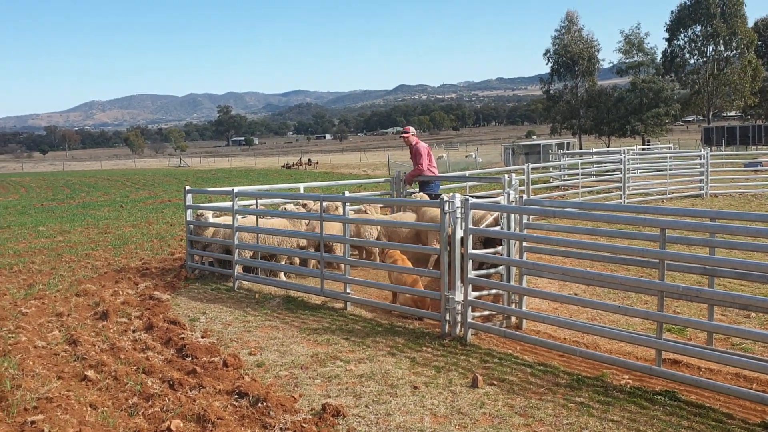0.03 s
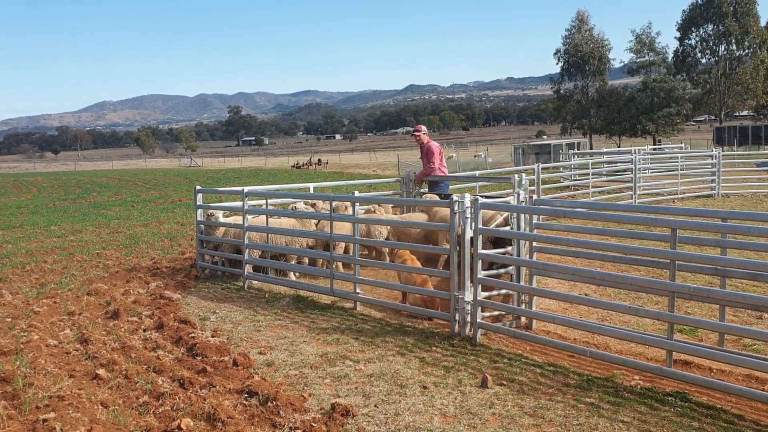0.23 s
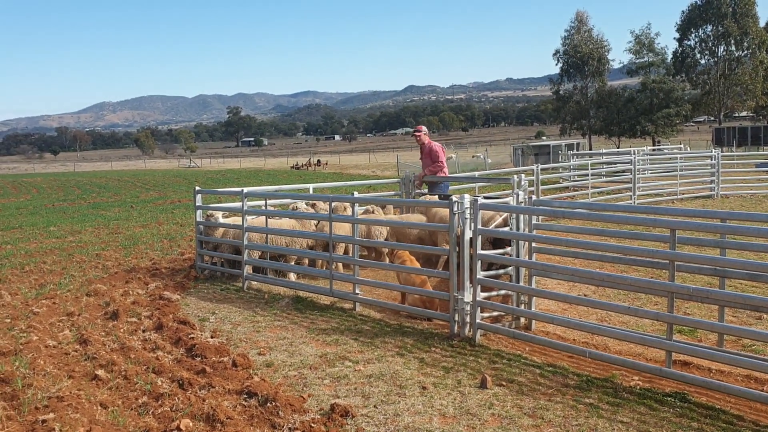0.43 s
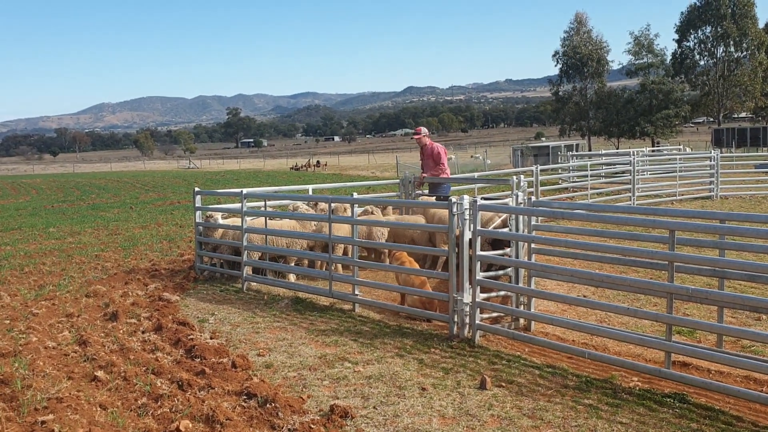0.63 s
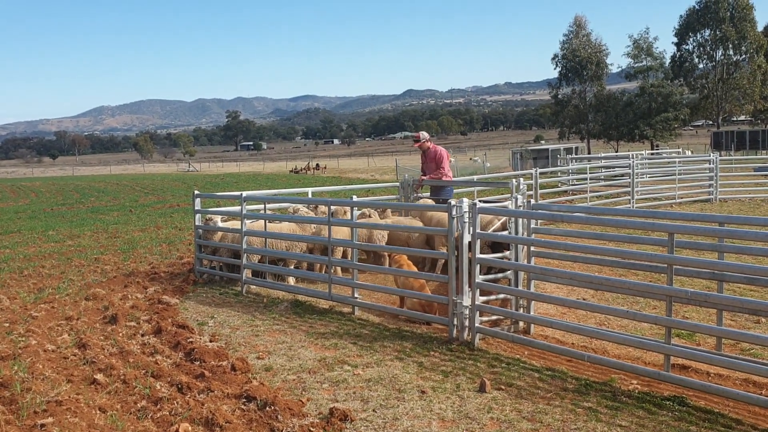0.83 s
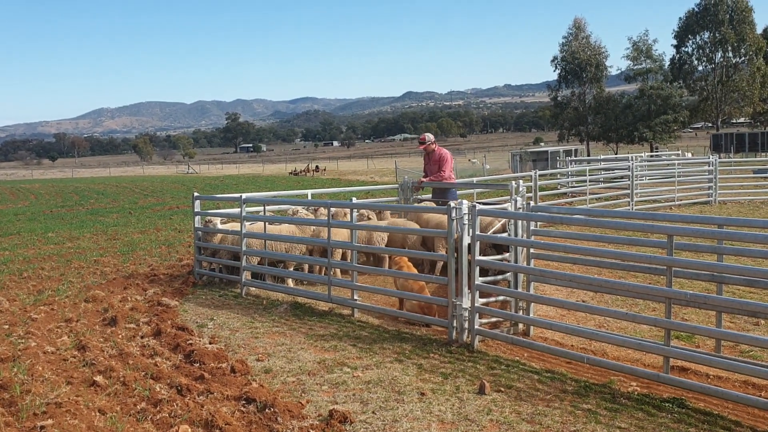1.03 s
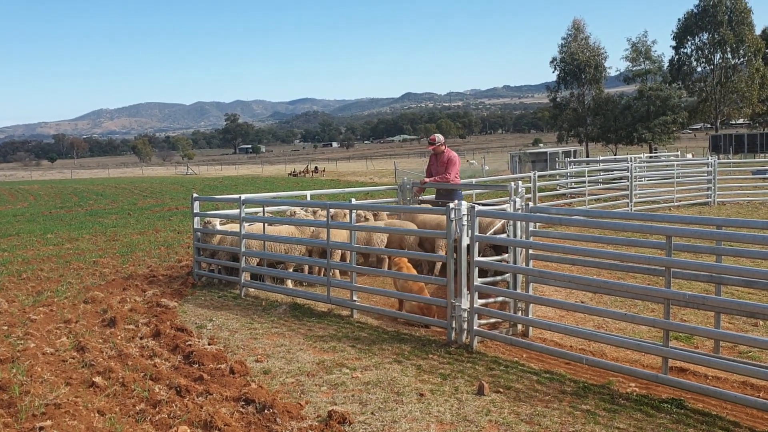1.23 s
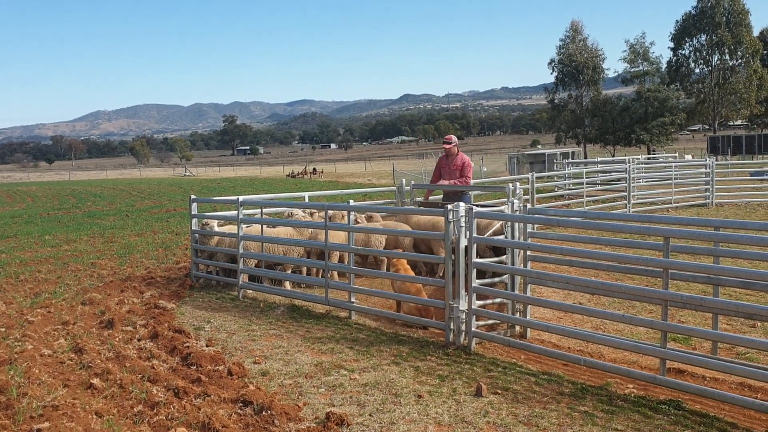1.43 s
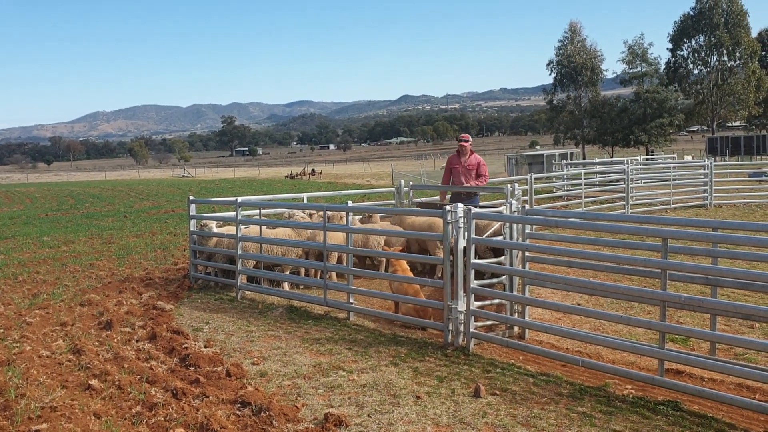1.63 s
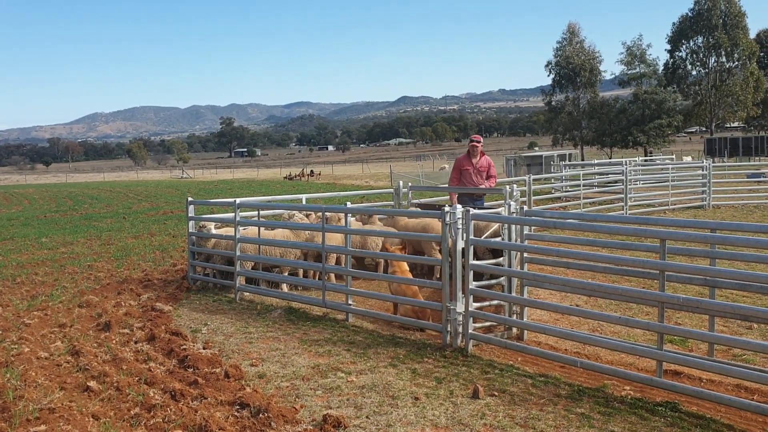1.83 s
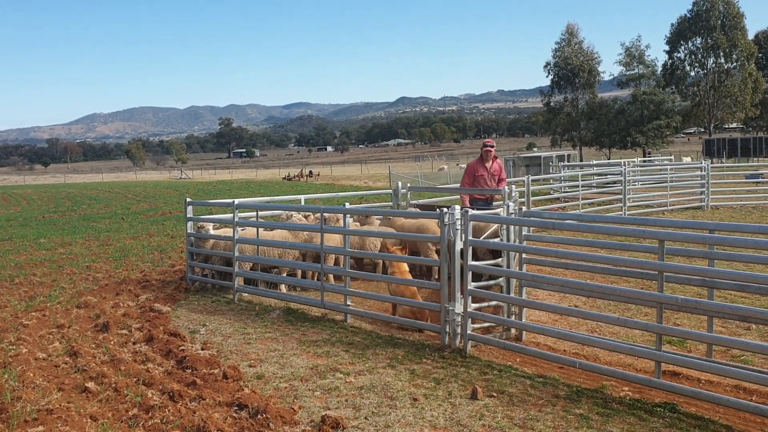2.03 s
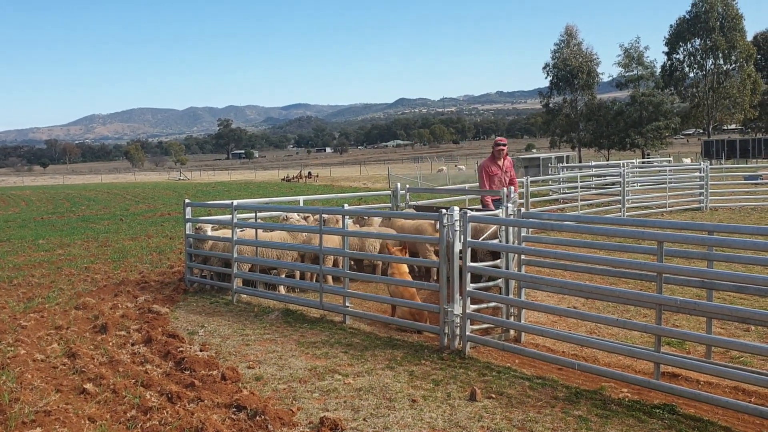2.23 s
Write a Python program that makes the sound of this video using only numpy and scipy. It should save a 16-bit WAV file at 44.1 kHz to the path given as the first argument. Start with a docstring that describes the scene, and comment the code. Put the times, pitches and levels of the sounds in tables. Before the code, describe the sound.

Steel pen rails clang at about 0.1 seconds and ring until roughly 0.8. Faint gate knocks build into a loud rattle against the post from 1.3 to 1.7 seconds, with sharp clacks and a faint low drone. More knocks come near 1.9 seconds, then fade. A small chain jingles high throughout. Light wind buffets the microphone in the open air, and everything is louder on the left.

```python
"""A steel stockyard panel is struck and rings, then a gate knocks and rattles against its post.
Each blow excites clear tube modes, dense overtones and a hollow clonk; the gate's frame drones low.
A chain jingles on the rails throughout, its small links ringing very high.
Light wind buffets the microphone over distant air. Outdoors, no room, louder on the left."""
import sys
import numpy as np
from scipy import signal
from scipy.fft import rfft, irfft, next_fast_len
from scipy.io import wavfile
from scipy.ndimage import uniform_filter1d

SR = 44100
rng = np.random.default_rng(int(sys.argv[2]) if len(sys.argv) > 2 else 0)


def wrap_up_sound(samples):
    """Save the sound to the file named by the first command line argument, as 16-bit audio."""
    columns = np.atleast_2d(samples).T
    # keep every value between -1 and 1, then stretch to whole-number steps
    tamed = np.clip(columns, -1, 1)
    steps = np.round(tamed * 32767).astype(np.int16)
    wavfile.write(sys.argv[1], SR, steps)


N = 101429
RING_N, EDGE_HZ, CONTACT_S = 57600, 14600, 0.00025
RING_TIME_S, BIN_HZ = np.arange(RING_N) / SR, np.fft.rfftfreq(RING_N, 1 / SR)
TIME_S = np.arange(N) / SR


def amp(db):
    """Decibels to gain."""
    return 10 ** (np.asarray(db) / 20)


def curve_at(points, hz):
    """Interpolates a table on a log-frequency axis."""
    point_hz, value = np.transpose(points)
    return np.interp(np.log(hz + 1), np.log(point_hz), value)


def add(mix, start_s, sound):
    """Mixes in a stereo sound."""
    part = mix[:, max(round(start_s * SR), 0):][:, :sound.shape[1]]
    part += sound[:, :part.shape[1]]


def equalise(x, colour, fft_size):
    """Filters by a table of Hz and dB."""
    gain = amp(curve_at(colour, np.fft.rfftfreq(fft_size, 1 / SR)))
    return irfft(rfft(x, fft_size) * gain, fft_size)


def noise(colour, length=N):
    """Steady coloured noise, rms 1."""
    size = next_fast_len(length)
    x = equalise(rng.standard_normal(size), colour, size)[:length]
    return x / np.sqrt(np.mean(x ** 2) + 1e-20)


def fade(t60_s, rise_s):
    """Linear rise, exponential decay."""
    return np.minimum(RING_TIME_S / rise_s, 1) * np.exp(-np.log(1000) * RING_TIME_S / t60_s)


# Each row: frequency in Hz, scale of the random phase between the ears in radians.
EAR_PHASE = [(500, -4), (1100, 0.04), (2000, 1.15), (4500, 1.5), (13000, 3.5)]


def strike(hz, spread_db=2.5):
    """Random strength and phase of each mode for one blow, at both ears."""
    strength, turns, apart = rng.standard_normal((3, len(hz)))
    left = amp(spread_db * strength) * np.exp(2j * np.pi * turns)
    return np.array([left, left * np.exp(1j * apart * curve_at(EAR_PHASE, hz))])


def tones(modes, size=RING_N, rise_s=0.00078, vary_levels=True):
    """Clear decaying modes, rms 1 before the envelope."""
    hz, db, t60_s = np.transpose(modes)
    t = RING_TIME_S[:size]
    blow = strike(hz)
    weight = amp(db) * (blow if vary_levels else blow / abs(blow))
    waves = np.exp(np.outer(2j * np.pi * hz - np.log(1000) / t60_s, t))
    return (weight @ waves).real * np.minimum(t / rise_s, 1) * np.sqrt(2) / np.linalg.norm(weight[0])


def overtone_bins(mean_gap_hz=13):
    """Picks the irregularly spaced modes of one steel body."""
    return np.flatnonzero((rng.random(len(BIN_HZ)) < BIN_HZ[1] / mean_gap_hz) & (BIN_HZ < EDGE_HZ))


def clash(bins, colour, decay, rise_s=CONTACT_S):
    """Dense modes struck at once, each band dying at its own rate; rms 1 before the envelope."""
    lines = np.zeros((2, len(BIN_HZ)), complex)
    lines[:, bins] = strike(BIN_HZ[bins]) * amp(curve_at(colour, BIN_HZ[bins]))
    lines *= RING_N / np.sqrt(2) / np.linalg.norm(lines[0])
    centres_hz, t60s = np.transpose(decay)
    bands = (irfft(lines * np.interp(BIN_HZ, centres_hz, band)) for band in np.eye(len(decay)))
    return sum(band * fade(t60_s, rise_s) for band, t60_s in zip(bands, t60s))


# Each row: frequency in Hz, relative density in dB.
AIR_SPECTRUM = [(100, 8), (500, -13.5), (1000, -8), (2000, -10), (5000, -20.5), (9000, -42.5),
                (14000, -12.5)]


def air(level_db=-66):
    """Distant air, independent on each side."""
    return amp(level_db) * np.array([noise(AIR_SPECTRUM), noise(AIR_SPECTRUM)])


def eddies(colour, length=N):
    """Turbulence of even strength."""
    x = noise(colour, length)
    power = uniform_filter1d(uniform_filter1d(x ** 2, size=600), size=600)
    return x / np.sqrt(power + 0.0014)


# Each row: time in seconds, left level in dB, right level in dB.
BREEZE_LEVELS = [(0, -44, -57.5), (.7, -43.5, -44), (1.2, -49.5, -62.5), (1.6, -47.5, -53.5),
                 (2.3, -43.5, -56)]
# Each row: frequency in Hz, relative density in dB.
BREEZE_SPECTRUM = [(20, -34), (36, -12), (58, 6), (90, 7.5), (150, -18), (300, -25), (550, -40),
                   (1200, -58.5)]
# Each row: centre in seconds, level in dB, Gaussian half width in seconds.
WIND_PUFFS = [(.278, -26, 0.012), (0.309, -21.5, 0.0044), (0.339, -19.5, .008), (0.352, -15.5, 0.0055),
              (0.384, -33, 0.015), (0.461, -26.5, .009), (0.484, -25.5, 0.011), (0.563, -28.5, 0.0061),
              (.648, -31.5, 0.013), (0.69, -28, 0.0081), (0.731, -34, 0.021), (0.905, -28, 0.0094),
              (0.994, -37.5, 0.0048), (1.031, -31, 0.0075), (1.063, -28.5, 0.0073), (1.088, -30, 0.009),
              (1.163, -37, 0.014), (1.226, -35, .013), (1.279, -38, 0.0074), (1.326, -36.5, 0.013),
              (1.53, -33.5, 0.0071), (1.567, -37, 0.016), (1.646, -35, 0.021), (1.747, -30, 0.012),
              (1.811, -31.5, 0.0066), (1.842, -32.5, 0.012), (1.908, -29, 0.015), (2.041, -40.5, 0.043),
              (2.211, -34.5, 0.0059)]
# Each row: multiple of PUFF_HZ, relative density in dB.
PUFF_SPECTRUM = [(.3, -14.5), (1, 7), (4, -29.5), (14, -75.5)]
PUFF_HZ, PUFF_N = 72, 12000


def wind():
    """A breeze rumbles on each microphone port separately; puffs thump on the left one."""
    times_s, left_db, right_db = np.transpose(BREEZE_LEVELS)
    out = np.array([amp(np.interp(TIME_S, times_s, db)) * eddies(BREEZE_SPECTRUM)
                    for db in (left_db, right_db)])
    offset_s = np.arange(-PUFF_N // 2, PUFF_N // 2) / SR
    colour = [(ratio * PUFF_HZ, db) for ratio, db in PUFF_SPECTRUM]
    for centre_s, db, width_s in WIND_PUFFS:
        puff = amp(db) * np.exp(-(offset_s / width_s) ** 2 / 2) * eddies(colour, PUFF_N)
        add(out, centre_s + offset_s[0], np.outer([1, 0], puff))
    return out


# Each row: start in seconds, level in dB, T60 in seconds, tilt in dB per kHz.
CHAIN_CLINKS = [(.004, -46.5, 0.051, 1), (0.097, -32, 0.29, 2), (0.118, -25.5, 0.29, -6),
                (.152, -32, 0.27, 8), (0.188, -30, 0.18, -1), (0.211, -28, 0.21, 0), (.258, -34, 0.26, -12),
                (0.301, -39.5, 0.15, -14), (0.338, -39.5, 0.088, -5), (0.416, -54, 0.27, -13),
                (0.434, -45.5, 0.18, -5), (0.479, -47, 0.79, -12), (.529, -37.5, 0.13, -8),
                (.544, -44.5, 0.23, 9), (.586, -41.5, 0.13, 3), (0.622, -49, 0.14, 1),
                (.651, -37.5, 0.23, -10), (.662, -33, 0.17, -4.5), (0.803, -49.5, 0.34, -2),
                (0.848, -49.5, 0.16, -1), (.946, -49, 0.23, -1), (1.144, -45.5, 0.057, -6),
                (1.232, -48.5, 0.3, -9), (1.288, -34.5, 0.12, -3), (1.382, -39, 0.19, -6),
                (1.483, -41, 0.61, -15), (1.518, -34.5, 0.28, 15), (1.584, -30.5, 0.16, -18),
                (1.591, -35.5, 0.3, -6), (1.877, -34, 0.28, -5), (1.995, -51.5, 0.14, -2)]
# Each row: frequency in Hz, relative level in dB, multiple of the clink's T60.
LINK_TONES = [(12482, 0, 1.15), (12515, -5, 1.1), (12578, -1, 1.1), (13050, -9, .9), (13122, -5, .9),
              (13206, -2, 1), (13310, -4, .9), (13376, -3, .9), (13430, -7, .9), (13763, -2, 1),
              (13916, -3, .9), (14025, -10, .8)]
# Each row: frequency in Hz, relative density in dB.
CHATTER_SPECTRUM = [(2000, -19), (9000, -77), (11500, -10), (12250, -3.5), (12530, 7), (12850, -14),
                    (13250, 9.5), (13600, -1.5), (13900, 13), (14500, -35)]


def chain(detune_hz=7, chatter_gain_db=-6.5, chatter_t60_s=0.17):
    """Small links, each tuned a little differently, ring very high and chatter on each other."""
    out = np.zeros((2, N))
    hz, db, t60_ratio = np.transpose(LINK_TONES)
    offset_khz = (hz - hz.mean()) / 1000
    for start_s, level_db, t60_s, tilt in CHAIN_CLINKS:
        link_hz = hz + detune_hz * rng.standard_normal(len(hz))
        link = np.transpose([link_hz, db + tilt * offset_khz, t60_ratio * t60_s])
        add(out, start_s, amp(level_db) * tones(link, size=14000, rise_s=0.0034))
        chatter = clash(overtone_bins(), CHATTER_SPECTRUM, [(0, chatter_t60_s)])
        add(out, start_s, amp(level_db + chatter_gain_db) * chatter)
    return out


def damping(start_s, ramp_s=0.06, depth_db=-12.5):
    """Gain drop that cuts a ring short."""
    return amp(depth_db * np.clip((TIME_S - start_s) / ramp_s, 0, 1))


# Each row: start in seconds, clash level in dB, clonk level in dB.
PANEL_BLOWS = [(0.096, -33, -33), (.109, -34, -47), (.121, -42.5, -53), (.133, -49, -37.5)]
# Each row: frequency in Hz, relative level in dB, T60 in seconds.
RAIL_TONES = [(780, -19, .45), (840, -14, .7), (929, 0, .95), (951, -6, .95), (970, -12, .8),
              (1028, -4.5, .97), (1073, -6, .9), (1122, -10.5, 1.0), (1193, -5, .95), (1271, -10, .8),
              (1357, -9, .85), (1448, -9, .55), (1545, -20, .7), (1836, -12, .5), (1945, -3, .45),
              (2105, -6, .3), (2190, -5.5, .55), (2310, -10, .4), (2778, -17, .6), (2848, -7.5, .66),
              (3028, -5.5, .46), (3483, -14, .42), (3700, -9, .3), (4107, -13, .5), (4441, -17, .9),
              (4511, -11, .6), (4538, -12, .8), (4630, -8.5, .78), (4694, -14, .74), (4867, -8, .5),
              (4985, -11, .5), (5157, -13, .45), (5633, -2, .38), (6002, -9, .29), (6390, -10, .22),
              (6525, -8, .2)]
# Overtones, and the faint ring before the blow. Each row: frequency in Hz, relative density in dB.
PANEL_SPECTRUM = [(250, -77.5), (600, -40), (720, -13), (900, -9), (1550, -20.5), (2000, 4), (3100, -6),
                  (4800, -6), (6500, -1.5), (9500, -6.5), (14500, -1.5)]
HUM_SPECTRUM = [(600, -23.5), (1700, -8.5), (2180, 3), (2600, -12), (4500, -13.5), (8000, -28),
                (14000, -11.5)]
# Each row: band centre in Hz, T60 in seconds.
PANEL_T60 = [(900, 1), (2000, 0.7), (3500, 0.69), (4700, 0.66), (6500, 0.32), (12000, 0.26)]


def panel(rails_start_s=0.099, rails_db=-27.5, hum_db=-56.5, hum_t60_s=0.68):
    """A blow and its rebounds swing the long rails up into a ring, then damped, overtones first."""
    overtones, rails = np.zeros((2, N)), np.zeros((2, N))
    body = overtone_bins()
    add(rails, rails_start_s, amp(rails_db) * tones(RAIL_TONES, rise_s=0.0076, vary_levels=False))
    for start_s, clash_db, clonk_db in PANEL_BLOWS:
        clang = amp(clash_db) * clash(body, PANEL_SPECTRUM, PANEL_T60)
        add(overtones, start_s, clang + amp(clonk_db) * clonk())
    add(overtones, 0, amp(hum_db) * clash(body, HUM_SPECTRUM, [(0, hum_t60_s)]))
    return overtones * damping(start_s=0.47) + rails * damping(start_s=0.726)


# Each row: frequency in Hz, relative density in dB.
CLONK_SPECTRUM = [(1400, -30.5), (1800, -20), (1965, -0.5), (2100, -16.5), (2500, -26), (3000, -37.5)]


def clonk(t60_s=0.18, rise_s=0.0075):
    """Short hollow note of a steel tube, normalised in energy."""
    note = clash(overtone_bins(), CLONK_SPECTRUM, [(0, t60_s)], rise_s)
    return note * np.linalg.norm(fade(t60_s, rise_s)) / np.linalg.norm(note[0])


# Each row: frequency in Hz, relative density in dB.
CLACK_SPECTRUM = [(300, -48), (600, -23), (900, -8), (1500, -13), (2400, 0), (3100, 1), (3900, 4),
                  (5000, 0), (5600, -1.5), (7200, -3), (10500, -8.5), (14500, -11)]


def clack_colour(tilt_db_per_octave, spot_hz, spot_db=8, spot_octaves=0.095):
    """Spectrum of steel on steel, tilted above 920 Hz, with the struck spot's resonance."""
    hz = np.geomspace(CLACK_SPECTRUM[0][0], EDGE_HZ, 300)
    tilt_db = tilt_db_per_octave * np.log2(np.maximum(hz, 920) / 4500)
    resonance_db = spot_db * np.exp(-(np.log2(hz / spot_hz) / spot_octaves) ** 2)
    return np.transpose([hz, curve_at(CLACK_SPECTRUM, hz) + tilt_db + resonance_db])


# Each row: frequency in Hz, relative level in dB, T60 in seconds.
FRAME_TONES = [(912, 0, .6), (996, -1, .85), (1073, 0, .85), (1125, -1, .65), (1168, -2, .6),
               (1723, -9, .5), (1954, 0, .42), (2008, 4, .45), (2153, -4, .38)]
# Each row: time in seconds, struck place as a fraction of the tube's length.
KNOCK_PLACES = [(1.35, .49), (1.6, .44), (1.9, .17)]


def frame_modes(start_s, node_leak=0.1):
    """A knock excites each frame mode as much as it moves at the struck place."""
    place = np.interp(start_s, *np.transpose(KNOCK_PLACES))
    return [(hz, db + 20 * np.log10(abs(np.sin(np.pi * k * place)) + node_leak), t60_s)
            for k, (hz, db, t60_s) in enumerate(FRAME_TONES, 1)]


# Each row: start in seconds, clack, clonk and ring levels in dB, clack tilt in dB per octave,
# resonance of the struck spot in Hz.
GATE_KNOCKS = [(.335, -53, -62, -80, -7, 4600), (0.364, -51.5, -45, -84, -11, 3730),
               (0.584, -74, -59.5, -71, -1, 2000), (.645, -59, -62.5, -70, -29, 1730),
               (.700, -61.5, -61, -71, -13, 3800), (0.818, -56.5, -60, -69, 4.5, 1960),
               (.868, -59, -61, -91, -12, 3150), (1.081, -64, -58.5, -71, -11, 3880),
               (1.118, -60.5, -62, -68, 2, 5100), (1.144, -52.5, -55, -63.5, -5, 5000),
               (1.16, -65, -52.5, -64, -11, 5100), (1.200, -69, -58.5, -72.5, -10, 4970),
               (1.255, -48.5, -55, -62, 3.5, 4900), (1.278, -42, -42, -56.5, 4, 5100),
               (1.292, -39.5, -39, -46.5, 7.5, 4960), (1.308, -37.5, -38, -49, -1, 2340),
               (1.347, -44, -45, -52, 2, 4820), (1.3706, -37, -40.5, -47, 6, 4270),
               (1.379, -38.5, -39, -47, 2, 2600), (1.461, -49, -54, -68, 2, 5260),
               (1.483, -28.5, -32, -47, 3.5, 4900), (1.495, -30, -35, -68.5, 22, 4950),
               (1.52, -27, -49, -43, 4.5, 3880), (1.55, -44.5, -45.5, -54.5, 6, 4160),
               (1.589, -43, -51, -50, -0.5, 6400), (1.723, -43.5, -44, -58.5, -7, 5150),
               (1.88, -52.5, -64.5, -59, 6, 3900), (1.929, -34, -41, -51.5, 1, 2470),
               (1.942, -39, -39, -54.5, -1, 2390), (1.993, -42.5, -56, -59, -2.5, 3440),
               (2.013, -53, -62, -70, -5, 4200), (2.073, -56, -63, -71.5, -2.5, 4500),
               (2.12, -60, -76, -79, 2, 3430), (2.155, -64.5, -74, -86.5, 1, 3480)]
# Each row: frequency in Hz, relative level in dB, T60 in seconds.
SPOT_TONES = [(2475, -1.5, 0.17), (3760, -1, 0.18), (4970, 0.5, 0.21)]
# Each row: frequency in Hz, relative density in dB.
FRAME_SPECTRUM = [(250, -17), (560, -6), (1000, 5), (1500, -6), (2000, 3), (3000, 1), (4200, 1),
                  (7000, -7.5), (10500, -26), (14500, -5)]
# Each row: band centre in Hz, T60 in seconds.
CLACK_T60 = [(1000, 0.12), (4000, 0.16), (12000, 0.19)]
FRAME_T60 = [(1000, 0.71), (4000, 0.72), (10000, 0.42)]
SOFT_KNOCK_DB, SOFT_RISE_S = -58, 0.0043  # harder knocks rise faster


def gate(crack_db=-13, crack_s=0.0018, spot_gain_db=-8, frame_gain_db=-3):
    """Each knock on the post gives a bright clack, a hollow clonk and a lasting ring of the frame."""
    out, body = np.zeros((2, N)), overtone_bins(mean_gap_hz=20)
    crack = 1 + amp(crack_db) * np.exp(-RING_TIME_S / crack_s)  # lifts the instant of contact
    for start_s, clack_db, clonk_db, ring_db, tilt, spot_hz in GATE_KNOCKS:
        colour = clack_colour(tilt, spot_hz)
        rise_s = CONTACT_S + SOFT_RISE_S * min(amp(SOFT_KNOCK_DB - clack_db), 1)
        clack = crack * clash(overtone_bins(mean_gap_hz=33.85), colour, CLACK_T60, rise_s)
        add(out, start_s, amp(clack_db) * clack + amp(clonk_db) * clonk())
        spot_modes = [(hz, db + curve_at(colour, hz), t60_s) for hz, db, t60_s in SPOT_TONES]
        add(out, start_s, amp(clack_db + spot_gain_db) * tones(spot_modes, size=12000, rise_s=rise_s))
        add(out, start_s, amp(ring_db) * clash(body, FRAME_SPECTRUM, FRAME_T60, rise_s))
        frame = tones(frame_modes(start_s), size=32000, vary_levels=False)
        add(out, start_s, amp(ring_db + frame_gain_db) * frame)
    return out


# Each row: start in seconds, level in dB.
SNAP_HITS = [(1.371, -18), (1.5225, -31)]
# Each row: frequency in Hz, relative level in dB, T60 in seconds.
SNAP_TONES = [(1266, -1.5, 0.0064), (2235, 0, 0.01), (2720, -4, .008), (3960, 3, 0.0095),
              (4650, -0.5, 0.0066)]


def snaps():
    """Steel meeting steel squarely gives a very short, dead snap."""
    out = np.zeros((2, N))
    for start_s, db in SNAP_HITS:
        add(out, start_s, amp(db) * tones(SNAP_TONES, size=2000, vary_levels=False))
    return out


# Each row: time in seconds, level in dB.
DRONE_LEVELS = [(0, -81), (1.25, -80), (1.5, -57.5), (1.65, -48.5), (1.85, -54), (2.051, -57.5), (2.3, -81)]
# Each row: frequency in Hz, relative density in dB.
DRONE_SPECTRUM = [(60, -10.5), (150, 1), (290, -0.5), (420, -8), (620, -25.5), (1200, -29.5)]


def drone():
    """The frame drones low as the gate moves."""
    return amp(np.interp(TIME_S, *np.transpose(DRONE_LEVELS))) * noise(DRONE_SPECTRUM)


# Each row: frequency in Hz, right channel gain in dB.
RIGHT_SHADE = [(400, -13), (1000, -10), (1400, -9), (1980, -2), (2600, -14), (4300, -10), (8000, -12.5),
               (13000, -21.5)]
RADIATION_HZ = 596  # thin tubes radiate little below this


def scene():
    """Steel and distant air, shaded on the right, with wind on top."""
    radiation = signal.butter(4, RADIATION_HZ, "highpass", fs=SR, output="sos")
    steel = signal.sosfilt(radiation, panel() + gate() + snaps())
    left, right = steel + drone() + chain() + air()
    right = equalise(right, RIGHT_SHADE, next_fast_len(N + RING_N))[:N]
    return np.array([left, right]) + wind()


def record(dry):
    """Steep low-pass at EDGE_HZ."""
    taps = signal.firwin(301, EDGE_HZ, window=("kaiser", 8), fs=SR)
    return signal.oaconvolve(dry, taps[None], "same", axes=1)


dry = scene()
out = record(dry)
wrap_up_sound(out)
```